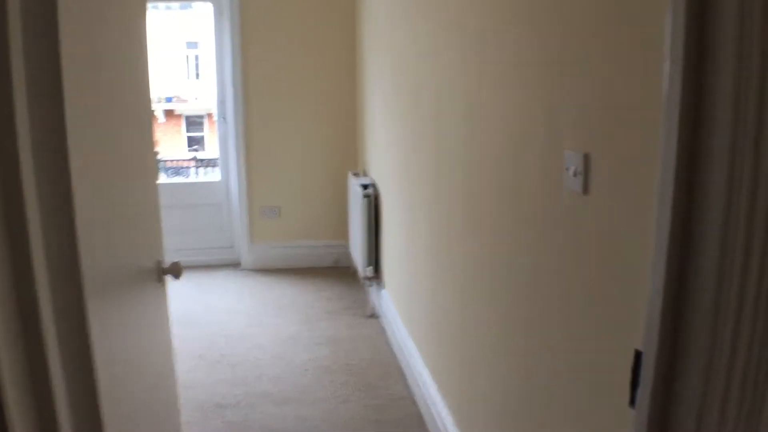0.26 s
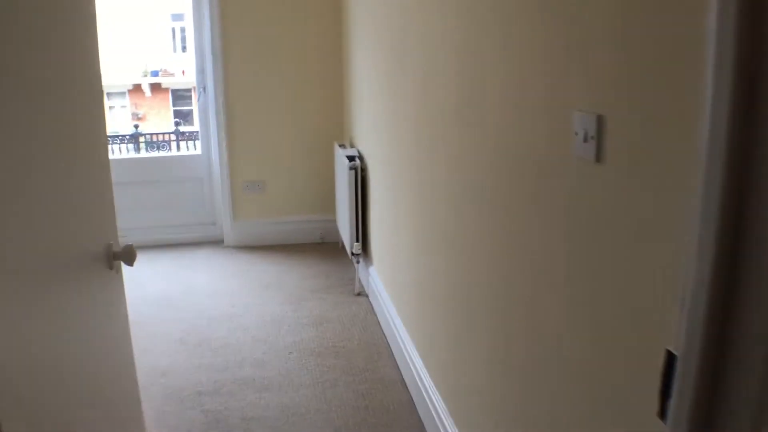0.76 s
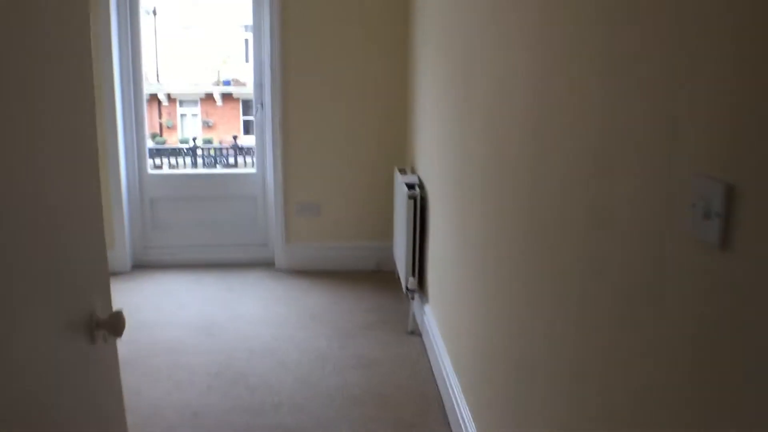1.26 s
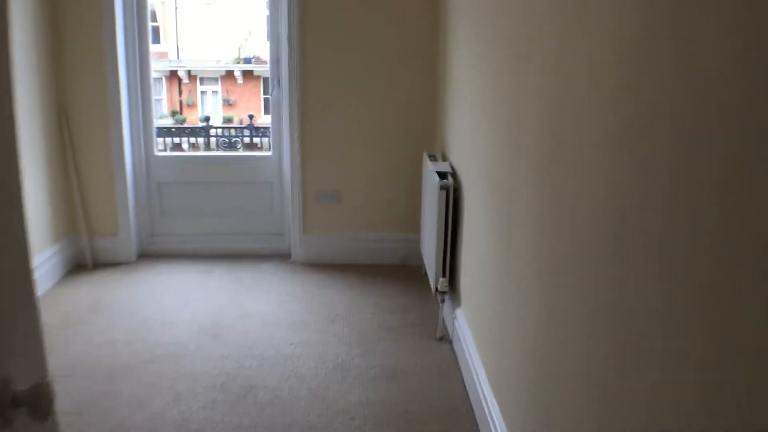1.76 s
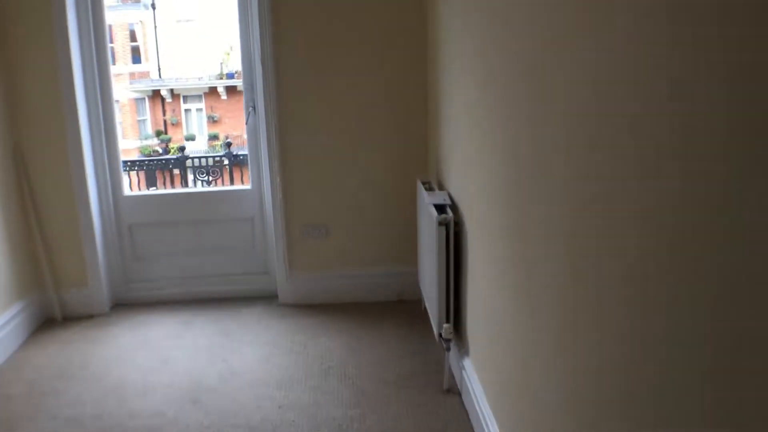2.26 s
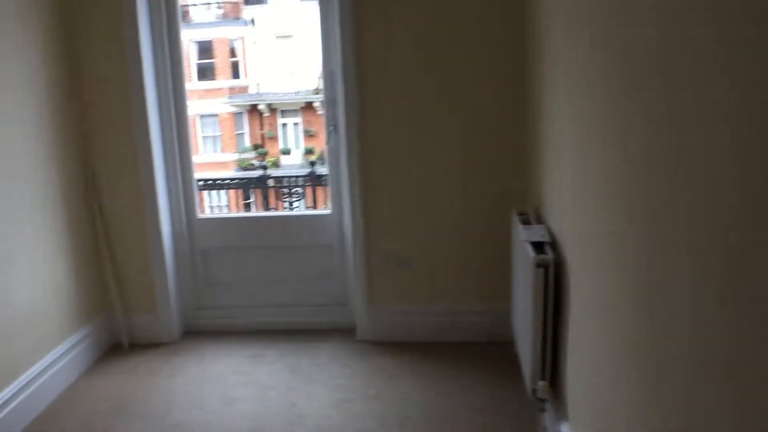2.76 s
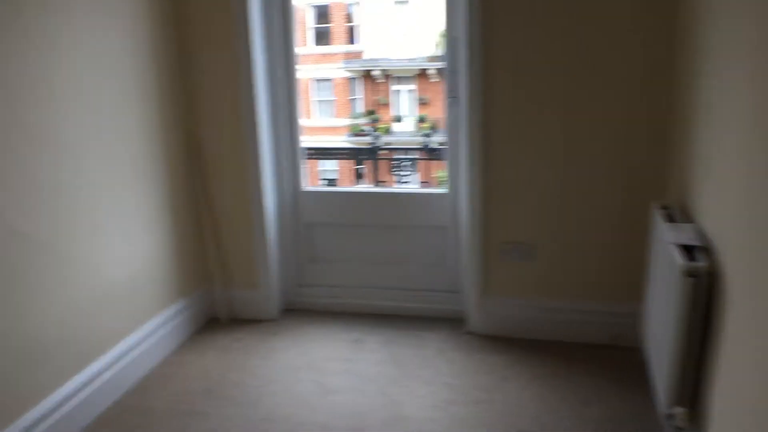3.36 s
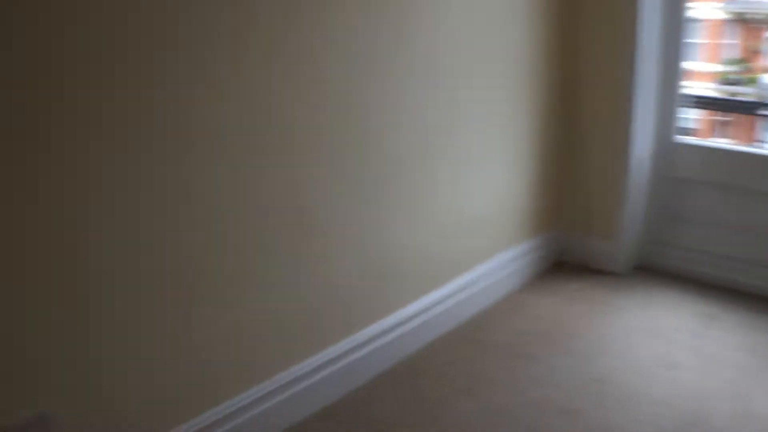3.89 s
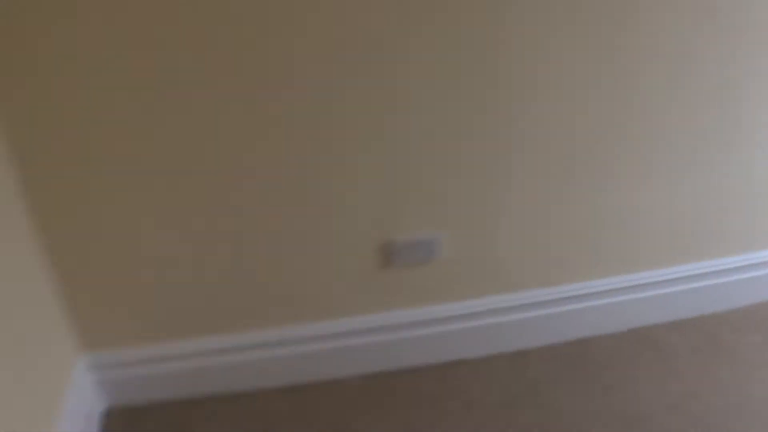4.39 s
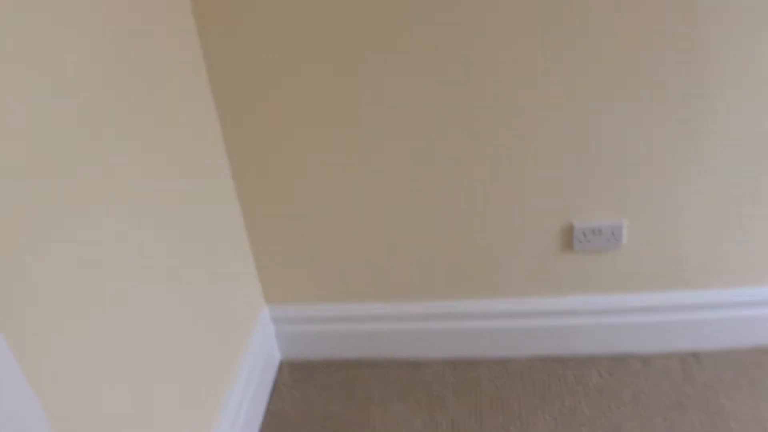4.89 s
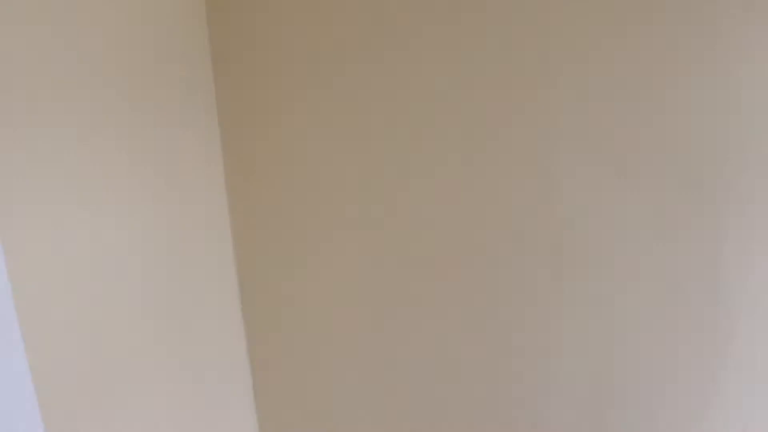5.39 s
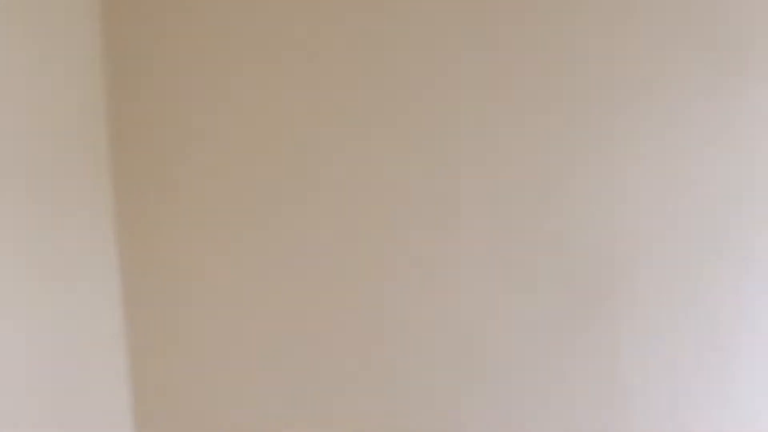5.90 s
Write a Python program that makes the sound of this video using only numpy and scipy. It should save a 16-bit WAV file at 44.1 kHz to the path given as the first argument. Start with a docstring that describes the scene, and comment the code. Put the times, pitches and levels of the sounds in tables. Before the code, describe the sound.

Faint room hiss and a wavering low hum begin alone. Around 0.35 s a tiny creak and cloth rustle start, then a close, dull double bump with a woody tock lands at 0.46 and 0.50 s. Soft low footfalls come at 0.85 and 1.12 s as rustling rises; a firm, bright brush of cloth passes at 1.37 s. The strongest footfall thumps at 1.76 s, deep and padded. Sharp camera ticks stand out at 2.08 and 2.66 s, with lighter steps at 2.1 and 2.66 s, creaking boards from 2.3 to 2.7 s and a rustle swell near 2.8 s. Softer ticks follow around 2.9 s, a gentle scuffing step at 3.19 s, then very faint steps. At 4.7 s a quiet hollow wooden clack rattles briefly. A light, high sleeve swish runs from 4.95 to 5.65 s, then mostly hum remains until about 6 s. The small bare room adds a short tail.

```python
"""A faint low hum and hiss come first, then a creak, rustling clothes and a double bump close by.
Someone walks slowly into a small empty carpeted room, holding a camera. Soft footfalls are low,
quickly dying tones; creaks, rustles, scuffs and ticks are shaped noise; bumps and a wooden clack
are sums of ringing tones. The room answers with a noisy tail and three low standing waves."""
import sys
import numpy as np
from scipy import signal
from scipy.fft import rfft, irfft, next_fast_len
from scipy.io import wavfile

SR = 44100
rng = np.random.default_rng(int(sys.argv[2]) if len(sys.argv) > 2 else 0)


def output_pcm(signal):
    """Save a mono or channel-first signal as 16-bit PCM at the path in sys.argv[1].

    Samples are clipped to [-1, 1] before scaling.
    """
    pcm = np.clip(np.atleast_2d(signal).T, -1, 1) * 32767
    wavfile.write(sys.argv[1], SR, np.round(pcm).astype(np.int16))


N = 270994
TIME = np.arange(N) / SR


def from_db(db):
    """Turn decibels into a gain."""
    return 10 ** (np.asarray(db) / 20)


def rms_one(x):
    """Scale a sound to an rms of 1."""
    return x / np.sqrt(np.mean(x ** 2) + 1e-20)


def gain_in_time(table):
    """Draw a gain curve through a table of times and levels."""
    times, levels = np.transpose(table)
    return from_db(np.interp(TIME, times, levels))


def at_hz(points, hz):
    """Read a table between its points, along a logarithmic frequency axis."""
    known_hz, values = np.transpose(points)
    return np.interp(np.log(np.maximum(hz, 1)), np.log(known_hz), values)


def coloured(x, colour):
    """Strengthen and weaken the pitches of a steady sound; rms 1."""
    size = next_fast_len(N)
    frequencies = np.fft.rfftfreq(size, 1 / SR)
    spectrum = rfft(x, size) * from_db(at_hz(colour, frequencies))
    return rms_one(irfft(spectrum, size)[:N])


def band(x, low_hz, high_hz, order=2):
    """Keep mainly what lies between two pitches."""
    edges = [low_hz, min(high_hz, .45 * SR)]   # stay below the highest possible pitch
    return signal.sosfilt(signal.butter(order, edges, "band", fs=SR, output="sos"), x)


def drift(rate, size=N):
    """Wander smoothly by chance, with a new target `rate` times a second."""
    targets = rng.standard_normal(N // 8)
    return np.interp(np.arange(size) * rate / SR, np.arange(len(targets)), targets)


def add(track, s, sound):
    """Mix a sound into a track at time s."""
    start = round(s * SR)
    track[start:start + len(sound)] += sound[:N - start]


def slips(low_hz, high_hz, t60, grain_db, grain_rate):
    """A dying cluster of tiny slips: grainy noise between two pitches, falling 60 dB in t60."""
    t = TIME[:SR // 3]
    fade = from_db(-60 * t / t60)
    grip = np.minimum(drift(grain_rate, len(t)), 1.5)   # no slip stands out too far
    force = rng.standard_normal(len(t)) * from_db(grain_db * grip) * fade
    noise = rms_one(band(force + 1e-18, low_hz, high_hz, order=3))
    return noise * np.sqrt(np.mean(fade ** 2))


# footfalls, and the boards settling after the heavy ones, before the board's own filtering:
# (time [s], level [dB], pitch [Hz], contact time [s])
FOOTFALLS = [(0.842, -27.5, 133.6, 0.00063), (0.847, -30, 299.1, 0.0053), (1.1216, -26.5, 160, 0.00037),
             (1.2, -38.5, 133, 0.0015), (1.7551, -11.5, 125.9, 0.00142), (1.769, -21.5, 243.6, 0.0046),
             (1.795, -24, 159.3, 0.0058), (1.822, -30, 247.3, 0.0048), (1.904, -37.5, 217, 0.0036),
             (2.092, -25, 119.6, 0.003106), (2.334, -40, 130, 0.0099), (2.664, -27.5, 108.7, 0.0045),
             (3.191, -27, 118.2, 0.02), (3.559, -40, 112, 0.0052), (3.853, -37, 141.6, 0.0262),
             (4.534, -40.5, 136, 0.026)]
# a softer, longer contact lets the board swing longer and stirs the room less
USUAL_CONTACT_S, SWING_T60_S, SWING_GROWTH = 0.00345, 0.04647, 0.496
THUD_ROOM_DB, ROOM_DB_PER_DOUBLING = -6.5, -2.5


def thuds():
    """A padded blow swings the struck board at its own pitch: (near sound, sound sent into the room)."""
    near, sent, t = np.zeros(N), np.zeros(N), TIME[:SR // 2]
    for s, db, hz, contact in FOOTFALLS:
        softness = contact / USUAL_CONTACT_S
        t60 = SWING_T60_S * softness ** SWING_GROWTH
        rise = 1 - np.exp(-t / contact)
        swing = np.sin(2 * np.pi * hz * t) * rise * from_db(db - 60 * t / t60)
        swing = band(swing, 0.31 * hz, 7 * hz, order=1)   # a board radiates little far from its own pitch
        add(near, s, swing)
        room_db = THUD_ROOM_DB + ROOM_DB_PER_DOUBLING * np.log2(softness)
        add(sent, s, swing * from_db(room_db))
    return near, sent


# creaks and knocks underfoot, before the boards colour them:
# (time [s], level [dB], centre [Hz], time to fall 60 dB [s], extra level sent into the room [dB])
CREAKS = [(0.338, -47.5, 1380, 0.042, -2), (0.414, -45, 2100, 0.0244, -1.5),
          (0.842, -41.5, 503, 0.0232, -1), (1.1195, -38.5, 845, 0.0152, 0.5), (1.146, -50.5, 415, 0.078, 1),
          (1.174, -51.5, 800, 0.0194, -1), (1.580, -51.5, 753, 0.0316, 0.5),
          (1.635, -38.5, 1827, 0.0262, -30), (1.7519, -41.5, 743, 0.0165, -1.5),
          (1.911, -52.5, 453, 0.0456, 0.5), (2.3214, -37, 1513, 0.0198, -5.5),
          (2.334, -46.5, 1320, 0.218, -5.5), (2.537, -49, 695, 0.0324, 0.5), (2.577, -52, 580, 0.019, -7),
          (2.596, -50.5, 548, 0.017, -1), (2.614, -49, 550, 0.0207, 2), (2.6335, -40.5, 775, 0.028, -5.5),
          (2.644, -43.5, 524, 0.013, -9), (2.652, -41, 440, 0.0128, -6), (2.662, -43.5, 690, 0.07, -2)]
CREAK_SPREAD = 1.925   # a creak rings this factor above and below its centre


def creaks():
    """Boards slip against each other under the weight: (near sound, sound sent into the room)."""
    near, sent = np.zeros(N), np.zeros(N)
    for s, db, hz, t60, room_db in CREAKS:
        cluster = slips(hz / CREAK_SPREAD, hz * CREAK_SPREAD, t60, grain_db=3.5, grain_rate=900)
        creak = from_db(db) * cluster
        add(near, s, creak)
        add(sent, s, creak * from_db(room_db))
    return boards(near), boards(sent)


# where the floorboards ring along: (pitch [Hz], width [Hz], level above the even response [dB])
BOARD_RESONANCES = [(341.6, 181, 13), (564, 60, 7)]


def boards(x):
    """Wood lifts the pitches at which it resonates."""
    total = x.copy()
    for hz, width, db in BOARD_RESONANCES:
        b, a = signal.iirpeak(hz, hz / width, fs=SR)
        total += from_db(db) * signal.lfilter(b, a, x)
    return from_db(-7.5) * total


# soles brushing the carpet, with the level before the swell:
# (start time [s], level [dB], length [s], lowest pitch [Hz], highest pitch [Hz])
SCUFFS = [(0.356, -61.5, 0.0965, 592, 2400), (1.761, -59.5, 0.148, 506, 1400),
          (2.553, -67.5, 0.17, 300, 1110), (3.188, -55.5, 0.0737, 794, 2620), (3.19, -62, 0.0936, 193, 602),
          (3.55, -68.5, 0.072, 180, 1200), (3.84, -71, 0.133, 187, 409)]


def scuffs():
    """A sole drags over the pile: a sparse crackle that swells fast and eases off."""
    out = np.zeros(N)
    for s, db, length, low_hz, high_hz in SCUFFS:
        progress = np.linspace(0, 1, round(length * SR))
        tufts = rng.standard_normal(len(progress)) * from_db(3.5 * drift(450, len(progress)))
        pressure = np.sin(np.pi * progress ** 0.776)
        add(out, s, from_db(db) * pressure * rms_one(band(tufts, low_hz, high_hz)))
    return out


# a double bump close by in the doorway, as the strength of each blow: (time [s], level [dB])
BUMPS = [(0.4626, -22.5), (0.4994, -37)]
# what the bump rings with, before its soft start and filtering:
# (pitch [Hz], level [dB], time to fall 60 dB [s])
BUMP_MODES = [(236.3, -0.5, 0.1353), (199, 16, 0.0219), (118.8, -5, 0.0916)]
BUMP_RISE_S = 0.00595


def bumps():
    """A dull blow and its rebound ring the same few low modes."""
    out, t = np.zeros(N), TIME[:SR // 2]
    ring = sum(np.sin(2 * np.pi * hz * t) * from_db(db - 60 * t / t60) for hz, db, t60 in BUMP_MODES)
    rise = 1 - np.exp(-t / BUMP_RISE_S)
    ring = band(ring * rise, 64.3, 630, order=1)
    for s, db in BUMPS:
        add(out, s, from_db(db) * ring)
    return out


# hard contacts in that double bump, before filtering:
# (time [s], level [dB], pitch [Hz], time to fall 60 dB [s])
TAPS = [(0.46, -33, 1790, 0.0073), (0.4616, -30.5, 945, 0.009), (0.4969, -31, 2215, 0.00357),
        (0.4988, -30.5, 708, 0.0123)]


def taps():
    """Hard edges meet as each bump lands: a short woody tock."""
    out, t = np.zeros(N), TIME[:SR // 10]
    for s, db, hz, t60 in TAPS:
        tock = np.sin(2 * np.pi * hz * t) * from_db(db - 60 * t / t60)
        add(out, s, band(tock, 0.346 * hz, 1.84 * hz))
    return out


# a hollow wooden clack and its rebounds as the walker turns: (time [s], level [dB])
CLACK = [(4.7062, -44), (4.7195, -45.5), (4.7265, -46), (4.746, -49.5), (4.768, -50)]
# what the wood rings with, before small chance shifts of pitch and level:
# (pitch [Hz], level against the contact [dB], time to fall 60 dB [s])
CLACK_MODES = [(276, -9, 0.1106), (393.3, -9.5, 0.106), (495.2, -8, 0.171), (592.2, -12, 0.34),
               (675.3, -9, 0.194), (1046, -8.5, 0.066), (1296, 0, 0.031), (1442, -9.5, 0.122),
               (1954, -12.5, 0.101), (2488, -21, 0.19)]


def clack():
    """Each contact is a short rough clatter that sets a loose piece of wood ringing."""
    out, t = np.zeros(N), TIME[:SR // 2]
    for s, db in CLACK:
        clatter = slips(371, 2100, t60=0.102, grain_db=5.0, grain_rate=540)
        add(out, s, from_db(db - 3.5) * clatter)
        for hz, mode_db, t60 in CLACK_MODES:
            strength = from_db(db + mode_db + 0.91 * rng.standard_normal())
            pitch = hz * (1 + 0.02536 * rng.standard_normal())   # the support shifts from contact to contact
            ring = strength * np.sin(2 * np.pi * pitch * t) * from_db(-60 * t / t60)
            add(out, s + 0.001935 * rng.random(), ring)
    return out


# colour of the coarse rub: (pitch [Hz], level per hertz [dB])
RUB_COLOUR = [(200, 7.5), (600, 0), (1500, -1), (2200, 1), (3200, -2.5), (4100, -2), (4900, -3.5),
              (6000, 0.5), (7000, -1.5), (7700, -8), (11000, -3), (14500, -10), (16000, -16.5)]
# colour of the fine swish: (pitch [Hz], level per hertz [dB])
SWISH_COLOUR = [(5000, -26.5), (7500, -12), (8700, -7.5), (9700, -5), (10300, -10), (11200, -3.5),
                (12400, -6.5), (13500, -13.5), (16000, -17)]
CLICK_DB = -8   # level of the ringing clicks against the rub


def clothes():
    """Pressed cloth rubs broadly; lightly sliding cloth gives a high swish."""
    rub_gain, swish_gain = friction()
    scrape = shifting_folds(fibres(grain_db=-1.0, flutter_db=1.39), depth_db=2.0)
    slide = shifting_folds(fibres(grain_db=2.0, flutter_db=1.5), depth_db=1.5)
    rub = rms_one(scrape) + from_db(CLICK_DB) * ringing_clicks()
    coarse = rub_gain * coloured(rub, RUB_COLOUR)
    fine = from_db(-2.656) * swish_gain * coloured(slide, SWISH_COLOUR)
    return coarse + fine


# how briskly the walker moves, which sets the steady rustle before the offsets below:
# (time [s], level [dB])
MOTION = [(0.0, -103), (0.32, -70.5), (0.54, -68), (0.77, -64), (0.98, -59.5), (1.23, -52), (1.48, -54.5),
          (1.59, -60.5), (1.75, -58), (2.3, -56), (2.46, -63), (2.56, -63), (2.84, -52.5), (3.05, -62.5),
          (3.29, -67.5), (3.58, -60.5), (3.67, -68.5), (4.4, -72), (4.6, -68), (4.95, -77.5), (6.1, -70)]
MOTION_RUB_DB, MOTION_SWISH_DB = -3, -2
# single strokes of cloth over cloth as arms and legs swing; clothes() scales the whole swish afterwards:
# (start time [s], length [s], coarse rub level [dB], fine swish level [dB])
STROKES = [(0.319, 0.2117, -60.5, -62.5), (0.692, 0.314, -78, -57.5), (0.97, 0.119, -59.5, -56),
           (1.615, 0.0237, -52, -47.5), (1.723, 0.065, -54.5, -58.5), (2.066, 0.0106, -61.5, -48),
           (2.158, 0.175, -66.5, -53.5), (2.487, 0.162, -60, -54), (2.656, 0.042, -57, -48.5),
           (2.735, 0.0677, -54.5, -53), (2.904, 0.031, -60, -50), (2.966, 0.0376, -57.5, -53),
           (3.187, 0.034, -59.5, -59), (3.376, 0.0215, -71.5, -56.5), (3.424, 0.08, -65.5, -67),
           (3.519, 0.1287, -59, -54), (3.832, 0.0654, -58.5, -59.5), (4, 0.0348, -68, -66.5),
           (4.442, 0.166, -68.5, -72), (4.663, 0.107, -65.5, -88.5)]


def friction():
    """Strokes add their power to the steady rustle of walking: (gain of the rub, gain of the swish)."""
    motion = gain_in_time(MOTION)
    rub_power = (motion * from_db(MOTION_RUB_DB)) ** 2
    swish_power = (motion * from_db(MOTION_SWISH_DB)) ** 2
    for s, length, rub_db, swish_db in STROKES:
        speed = stroke(length, attack_share=0.725, fall_db_per_s=200.5)
        add(rub_power, s, (speed * from_db(rub_db)) ** 2)
        add(swish_power, s, (speed * from_db(swish_db)) ** 2)
    return np.sqrt(rub_power), np.sqrt(swish_power)


def stroke(length, attack_share, fall_db_per_s):
    """Cloth gathers speed, slides on, then comes to rest."""
    t = TIME[:2 * SR]
    attack = np.sin(np.pi / 2 * np.minimum(t / (attack_share * length), 1))
    return attack * from_db(-fall_db_per_s * np.maximum(t - length, 0))


def fibres(grain_db, flutter_db):
    """Friction of cloth: noise for countless fibre snaps that come in clumps."""
    return rng.standard_normal(N) * from_db(grain_db * drift(1800) + flutter_db * drift(120))


def shifting_folds(x, depth_db):
    """As the folds move, each third of an octave swells and fades on its own."""
    edges = 400 * 2 ** (np.arange(17) / 3)
    total = x.copy()
    for low, high in zip(edges, edges[1:]):
        change = from_db(depth_db * drift(14)) - 1
        total += change * band(x, low, high, order=1)
    return total


CLICKS_PER_S, CLICK_LOW_HZ, CLICK_HIGH_HZ, CLICK_WIDTH_HZ = 450, 1400, 13082, 118


def ringing_clicks():
    """Sparse random clicks, each with a brief ring at one of 40 pitches; rms 1."""
    happens = rng.random(N) < CLICKS_PER_S / SR
    sizes = from_db(4.0 * np.minimum(rng.exponential(1, N), 2)) * rng.choice([-1, 1], N)
    pitches = np.geomspace(CLICK_LOW_HZ, CLICK_HIGH_HZ, num=40)
    dealt = rng.integers(len(pitches), size=N)   # which pitch each click gets
    rings = np.zeros(N)
    for k, hz in enumerate(pitches):
        b, a = signal.iirpeak(hz, hz / CLICK_WIDTH_HZ, fs=SR)
        rings += signal.lfilter(b, a, happens * sizes * (dealt == k) + 1e-18)
    return rms_one(rings)


# colour of clothing brushing past the door: (pitch [Hz], level per hertz [dB])
BRUSH_COLOUR = [(200, -9), (550, 0.5), (1600, -1.5), (2600, -3.5), (3400, -2.5), (3950, 3), (4800, -4),
                (5400, -0.5), (6300, -3.5), (7600, -7.5), (8500, -3.5), (12000, -3), (16000, -14)]
BRUSH_START_S, BRUSH_LENGTH_S, BRUSH_DB = 1.3644, 0.086, -47


def brush():
    """One firm, bright sweep of cloth, gritty with small ringing clicks."""
    speed = np.zeros(N)
    add(speed, BRUSH_START_S, stroke(BRUSH_LENGTH_S, attack_share=1, fall_db_per_s=117.5))
    cloth = rms_one(fibres(grain_db=-1.5, flutter_db=1.0)) + from_db(-10.5) * ringing_clicks()
    return from_db(BRUSH_DB) * speed * coloured(cloth, BRUSH_COLOUR)


# colour of a sleeve sliding lightly through the slow turn: (pitch [Hz], level per hertz [dB])
SLIDE_COLOUR = [(600, -18.5), (1000, -11), (2300, -14.5), (4900, -17), (5900, -13), (7500, -14), (9500, -5),
                (10400, -6), (11400, 1), (12400, -5), (13800, -10.5), (16000, -23.5)]
SLIDE_START_S, SLIDE_LENGTH_S, SLIDE_DB = 4.9445, 0.699, -59


def sleeve():
    """One long light slide of fine cloth: a high, even swish."""
    speed = np.zeros(N)
    add(speed, SLIDE_START_S, stroke(SLIDE_LENGTH_S, attack_share=0.537, fall_db_per_s=50.5))
    cloth = fibres(grain_db=0.68, flutter_db=1.5)
    return from_db(SLIDE_DB) * speed * coloured(cloth, SLIDE_COLOUR)


# sharp ticks of the camera in the hand:
# (time [s], level [dB], centre [Hz], time for the tick itself to fall 60 dB [s])
TICKS = [(0.336, -54, 10860, 0.0235), (0.459, -43, 12000, 0.01), (0.481, -46.5, 5200, 0.0055),
         (0.485, -49, 5400, 0.0055), (0.4965, -43.5, 11100, 0.0083), (1.177, -47.5, 4000, 0.038),
         (1.453, -40.5, 14000, 0.056), (1.6234, -43, 9000, 0.0257), (1.909, -46.5, 3220, 0.0265),
         (2.0755, -29.5, 7540, 0.00884), (2.6636, -29.5, 8740, 0.0063), (2.9143, -38, 9500, .013),
         (2.9866, -38, 14300, 0.0153), (3.453, -49, 13900, 0.0215), (3.47, -47.5, 7700, 0.0242)]


def ticks():
    """The plastic case catches and lets go in a quick burst of slips, and rings faintly on."""
    out, spread = np.zeros(N), 1.55
    for s, db, hz, t60 in TICKS:
        low_hz, high_hz = hz / spread, hz * spread
        tick = slips(low_hz, high_hz, t60, grain_db=7.0, grain_rate=1500)
        tail = slips(low_hz, high_hz, 5 * t60, grain_db=7.0, grain_rate=590)
        add(out, s, from_db(db) * tick)
        add(out, s, from_db(db - 16.5) * tail)
    return out


SWAY_S = 0.00012   # typical wander of each copy's delay


def shifting_ripple(x):
    """Mix in four faint, very short copies with slowly wandering delays: a light, shifting ripple in the colour."""
    copies = np.zeros(N)
    for delay in rng.uniform(.001, .005, size=4):
        read_time = TIME - delay - SWAY_S * drift(3)
        copies += x[np.clip(np.round(read_time * SR).astype(int), 0, N - 1)]
    gain = from_db(-16.5)
    return (x + gain * copies) / np.hypot(1, 2 * gain)   # four copies add up to twice one copy's rms


# how long the room rings on: (pitch [Hz], time to fall 60 dB [s])
ROOM_DECAY = [(80, 0.325), (250, 0.794), (600, 0.772), (1500, 0.397), (4000, 0.226), (12000, 0.31)]
# its low standing waves: (pitch [Hz], level at resonance [dB], time to fall 60 dB [s])
ROOM_MODES = [(76.18, 5.4, 1), (121.93, 3.34, 0.205), (238.75, 0.87, 0.334)]


def room(x):
    """Bare walls return a dense tail, shorter in the treble than the middle, with bass standing waves."""
    t, response = TIME[:SR], np.zeros(SR)
    for low in 45 * 2 ** np.arange(9.):
        t60 = at_hz(ROOM_DECAY, low * np.sqrt(2))
        tail = band(rng.standard_normal(SR), low, 2 * low) * from_db(-60 * t / t60)
        response += tail * np.sqrt(2 * low / SR / np.sum(tail ** 2))   # each octave passes at about gain 1
    for hz, db, t60 in ROOM_MODES:
        height = 2 * np.log(1000) / (t60 * SR)   # gain 1 at resonance, before the mode's own level
        response += height * from_db(db - 60 * t / t60) * np.sin(2 * np.pi * hz * t)
    first_wall = np.zeros(round(.009 * SR))   # silence until the first reflection
    return signal.fftconvolve(x, np.concatenate([first_wall, response]))[:N]


# low hum of the building, before it wavers: (time [s], level [dB])
HUM = [(0.0, -73), (0.8, -70.5), (1.05, -60.5), (1.45, -75.5), (2.3, -65), (3.3, -74), (3.75, -68.5),
       (3.97, -59.5), (4.25, -73), (4.52, -61), (4.95, -74), (5.5, -67), (5.75, -62), (5.92, -68)]
# colour of the still room: (pitch [Hz], level per hertz [dB])
STILL_COLOUR = [(25, -25), (50, 0.5), (70, -6.5), (110, -6.5), (250, -12), (600, -17), (1200, -20.5),
                (3000, -24), (8000, -30.5), (16000, -34.5)]
STILL_DB, HUM_HZ = -70.5, 50.64


def background():
    """Faint even room noise, and a low hum that wavers in pitch and level."""
    hiss = from_db(STILL_DB) * coloured(rng.standard_normal(N), STILL_COLOUR)
    pitch = HUM_HZ + 1.872 * drift(4.8)
    tone = np.sqrt(2) * np.sin(2 * np.pi * np.cumsum(pitch) / SR)
    return hiss + gain_in_time(HUM) * tone * from_db(2.0 * drift(10))


def scene():
    """Everything reaches one microphone, which feeds both channels."""
    thud, thud_sent = thuds()
    creak, creak_sent = creaks()
    scuff, wood, bump = scuffs(), clack(), bumps() + taps()
    handling = shifting_ripple(clothes() + brush() + sleeve() + ticks())
    sent = thud_sent + creak_sent + from_db(-34) * bump + from_db(-3.5) * scuff
    sent = sent + from_db(-9.5) * wood + from_db(-10.0) * handling
    mono = thud + bump + creak + scuff + wood + handling + room(sent) + background()
    return np.array([mono, mono])


CUTOFF_HZ = 15900


def record(dry):
    """The microphone thins the deep bass; the top is cut."""
    thin = signal.sosfilt(signal.butter(4, 36, "high", fs=SR, output="sos"), dry)
    return signal.sosfilt(signal.ellip(10, .1, 70, CUTOFF_HZ, fs=SR, output="sos"), thin)


dry = scene()
out = record(dry)
output_pcm(out)
```